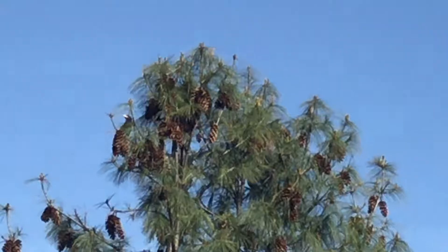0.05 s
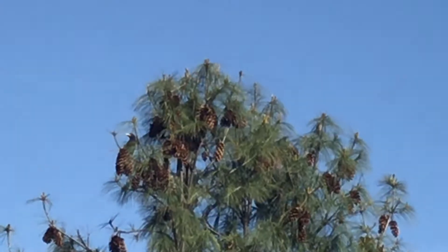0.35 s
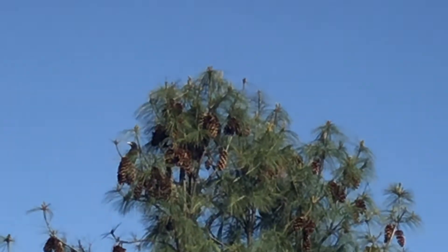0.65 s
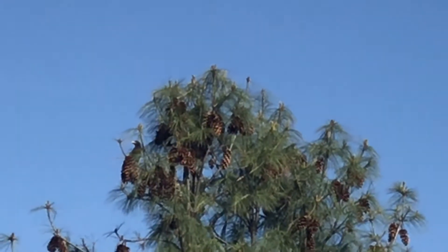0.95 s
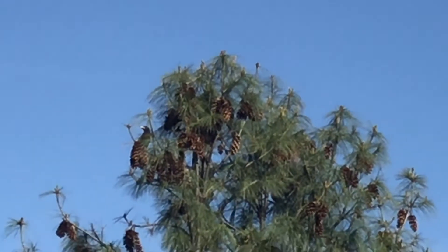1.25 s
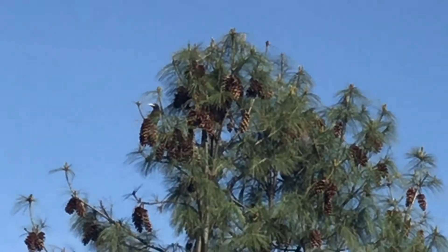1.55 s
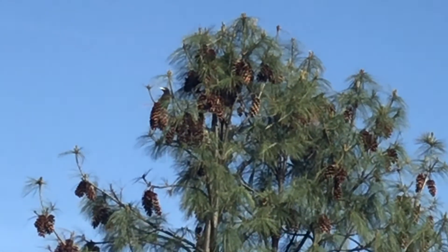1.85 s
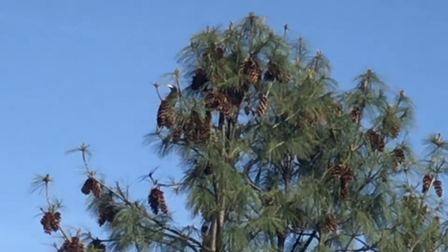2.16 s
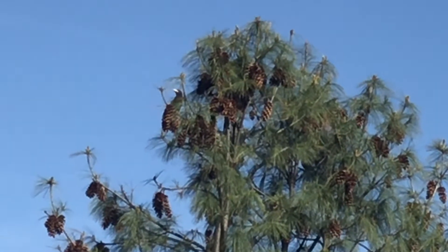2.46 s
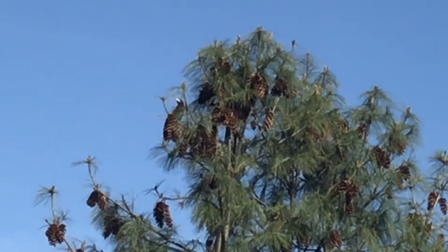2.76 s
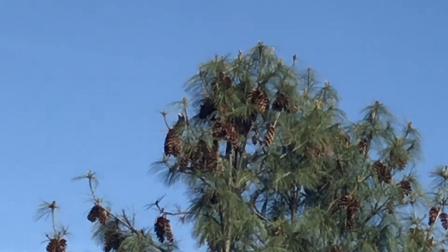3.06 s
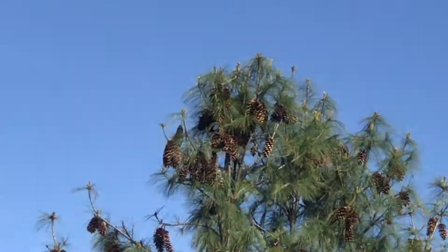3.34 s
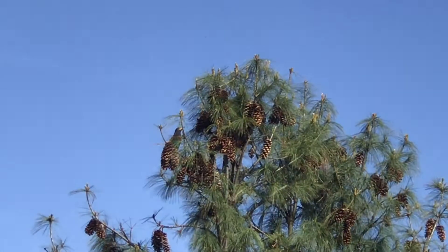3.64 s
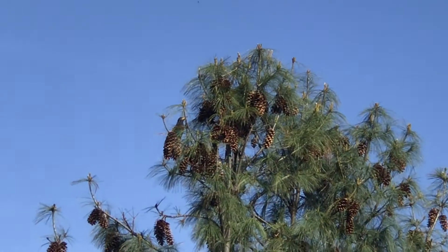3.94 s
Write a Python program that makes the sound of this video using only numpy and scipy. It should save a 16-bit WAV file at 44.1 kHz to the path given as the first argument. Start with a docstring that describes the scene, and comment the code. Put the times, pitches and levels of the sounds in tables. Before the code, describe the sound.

Small birds whistle thin, gliding notes in a pine over soft hiss and handling bumps.

```python
"""Under a pine, microphone on a hand-held camera. Open air murmurs and hisses over a low drone.
From half a second a larger bird, far off, repeats a falling call; faint peeps come from the crown.
Then small birds overhead whistle thin, gliding notes, and the recorder's noise suppression turns down
the murmur and hiss for about a second. The hand rustles and clicks on the case here and there,
with one thump just after three seconds; the birds sing on to the end."""
import sys
import numpy as np
from scipy import signal
from scipy.fft import rfft, irfft
from scipy.io import wavfile
from scipy.ndimage import uniform_filter1d

SR = 44100
rng = np.random.default_rng(int(sys.argv[2]) if len(sys.argv) > 2 else 0)


def generate_wav(signal):
    """Clip the signal to [-1, 1] and save it as 16-bit WAV at the path in sys.argv[1]."""
    frames = np.transpose(np.atleast_2d(signal))
    scaled = np.clip(frames, -1, 1) * 32767
    pcm = np.round(scaled).astype(np.int16)
    wavfile.write(sys.argv[1], SR, pcm)


N = 176400
T = np.arange(N) / SR

# Whistles overhead in the crown: level/dB before the throat resonance, path of (t/s, f/Hz)
WHISTLES = [ (-77, [(.65, 7200), (.658, 4550), (.698, 5230)]), (-80, [(1.595, 5270), (1.63, 6160),
            (1.668, 5300), (1.708, 4870)]), (-78, [(1.78, 6150), (1.81, 5700)]), (-66, [(1.83, 4510),
            (1.85, 4550), (1.932, 6080), (1.952, 6100)]), (-67.5, [(1.989, 4670), (2.008, 4520),
            (2.028, 5220), (2.046, 4160)]), (-65, [(2.048, 4300), (2.056, 6730), (2.103, 6080),
            (2.14, 4650), (2.2, 3620)]), (-69.5, [(2.294, 6240), (2.301, 5540), (2.335, 5130)]),
            (-68, [(2.352, 3900), (2.382, 5900), (2.421, 6150)]), (-71.5, [(2.428, 7380), (2.438, 5620),
            (2.465, 5000), (2.497, 4960)]), (-68, [(2.547, 6700), (2.578, 5630), (2.592, 7900)]),
            (-70, [(2.6, 6150), (2.612, 4690), (2.632, 4550), (2.72, 6100), (2.744, 6040)]),
            (-75.5, [(2.657, 6400), (2.677, 6700)]), (-71, [(2.747, 6100), (2.776, 6450)]),
            (-67.5, [(2.782, 4720), (2.802, 4550), (2.818, 5110), (2.835, 4340)]), (-74, [(2.832, 5200),
            (2.85, 6550), (2.895, 6050)]), (-75, [(2.858, 4500), (2.882, 6600)]), (-66.5, [(2.888, 7360),
            (2.895, 6100), (2.91, 5550), (2.935, 7900)]), (-72, [(2.92, 5100), (2.985, 3760)]),
            (-69, [(2.995, 6000), (3.03, 6430), (3.048, 7300)]), (-68, [(3.063, 7330), (3.076, 6380),
            (3.105, 6350)]), (-70, [(3.132, 8500), (3.146, 7600), (3.178, 7100), (3.21, 7750)]),
            (-69.5, [(3.26, 5740), (3.294, 5900), (3.312, 5360)]), (-68.5, [(3.353, 4670), (3.369, 5450),
            (3.383, 7550)]), (-67, [(3.393, 7950), (3.401, 6030), (3.47, 6700)]), (-70.5, [(3.514, 8300),
            (3.532, 7300), (3.588, 7030), (3.615, 6280), (3.675, 4600)]), (-74, [(3.535, 4650),
            (3.565, 6150), (3.6, 6200)]), (-70.5, [(3.678, 4500), (3.69, 5260), (3.718, 8300)]),
            (-66.5, [(3.785, 5440), (3.836, 5370)]), (-69, [(3.838, 5150), (3.873, 6170), (3.893, 4950),
            (3.912, 4300)]), (-67.5, [(3.95, 4300), (3.975, 5360), (4.01, 5450)])]
# Faint contact calls from the same tree: t/s, level/dB
PEEPS = [(0.577, -78), (.652, -79.5), (.743, -79.5), (.84, -82)]
# Pitch path of one peep: t/s from its start, f/Hz
PEEP_PATH = [(0, 6760), (.025, 7230), (.055, 7130)]
THROAT_HZ, THROAT_WIDTH_HZ = 6050, 2950
ECHO_S, ECHO_DB, NEEDLES_DB = 0.026, -19.5, -5


def small_birds():
    """Overhead: whistles, two-voiced peeps and one buzz, with a near echo and scatter off the needles."""
    song = np.zeros(N)
    for db, path in WHISTLES:
        add(song, path[0][0], note(path, db))
    song = resonance(song, THROAT_HZ, THROAT_WIDTH_HZ)
    upper_voice = [(t, hz * 1.16) for t, hz in PEEP_PATH]
    for start, db in PEEPS:
        add(song, start, note(PEEP_PATH, db, trill_hz=200))
        add(song, start, note(upper_voice, db - 8.5, crest=0.57))
    buzz = note([(0, 2790), (0.125, 2980)], db=-77, crest=0.89, trill_hz=90)
    add(song, 1.85, buzz)
    echo = from_db(ECHO_DB) * np.interp(T - ECHO_S, T, song)
    return song + echo + from_db(NEEDLES_DB) * scatter(song, t60_s=0.34)


GLIDE_S, NOTE_EDGE_S, TRILL_RATE_HZ = 0.009, 0.0033, 82
QUAVER_SHARE, FLUTTER_DB = 0.0058, 3


def note(path, db, crest=0.61, trill_hz=0, swell_db=4):
    """One bird note: a pure tone glides along its path, trills by +/- trill_hz, swells and fades."""
    t = np.arange(0, max(path[-1][0] - path[0][0], .01), 1 / SR)
    hz = uniform_filter1d(curve(path, t + path[0][0]), int(GLIDE_S * SR), mode="nearest")
    hz *= 1 + QUAVER_SHARE * drift(100, len(t))
    hz += trill_hz * np.sin(2 * np.pi * TRILL_RATE_HZ * t)
    swell = np.interp(t / t[-1], [0, crest, 1], [-swell_db, 0, -swell_db])
    gain = from_db(db + swell + FLUTTER_DB * drift(60, len(t)))
    edges = np.sin(np.pi / 2 * np.clip(np.minimum(t, t[-1] - t) / NOTE_EDGE_S, 0, 1))
    return np.sqrt(2) * edges * gain * sine(hz)


# Long calls, far off in the valley: t/s, level/dB, length/s
FAR_CALLS = [(0.531, -77, 0.54), (1.52, -77.5, 0.36), (2.439, -82, 0.53), (3.53, -77, 0.52)]
# Pitch path of one call: t/s from its start, f/Hz
FAR_PATH = [(0, 1467), (.04, 1420), (.08, 1216), (.21, 1201), (.255, 1280), (.38, 1254), (.55, 1175)]
# Short notes at the same distance: t/s, level/dB, f/Hz
FAR_PIPS = [(1.45, -77, 1770), (1.67, -77, 1690), (1.945, -73, 1364), (2.099, -76, 1400)]
PIP_S, PIP_SAG_HZ, VALLEY_DB = 0.067, 40, -5.5


def far_bird():
    """Far off: a call drops, steps up and sags about once a second, with short pips; distance blurs it."""
    calls = np.zeros(N)
    for start, db, length in FAR_CALLS:
        path = [(t, curve(FAR_PATH, t)) for t in T[:int(length * SR):SR // 100]]
        add(calls, start, note(path, db, swell_db=1))
    for start, db, hz in FAR_PIPS:
        add(calls, start, note([(0, hz), (PIP_S, hz - PIP_SAG_HZ)], db))
    return calls + from_db(VALLEY_DB) * scatter(calls, t60_s=0.26)


# Knocks right at the microphone: t/s, level/dB before filtering, settling f/Hz, treble limit f/Hz
KNOCKS = [(.557, -49.5, 152, 1190), (0.9627, -40.5, 100, 1290), (2.2278, -49, 300, 6130),
          (2.532, -57.5, 300, 5900), (2.911, -39, 248, 4530), (3.0718, -21.5, 34.3, 2690),
          (3.19, -46.5, 220, 2770), (3.223, -48, 219, 1400), (3.258, -48, 225, 1990)]
# Resonances of the camera case: f/Hz, width/Hz, level/dB relative to the knocks
CASE_MODES = [(224, 65, -11), (592, 60, -3), (1194, 37, -3), (2590, 210, -2.5)]
SWEEP_START_S, SWEEP_CYCLES_PER_HZ = 0.00015, 0.0001803  # brighter knocks sweep further
THUD_DECAY_S, THUD_AT_HZ, THUD_POWER = 0.0064, 150, 0.76  # higher thuds die sooner
RATTLE_DB, RATTLE_BAND_HZ = -10, (220, 1580)


def knocks():
    """On the case: treble arrives first, so each knock sweeps down to a thud; the case rattles, rings."""
    hits, t = np.zeros(N), T[:SR // 5]
    for start, db, hz, top_hz in KNOCKS:
        sweep_hz = SWEEP_CYCLES_PER_HZ * top_hz / (t + SWEEP_START_S)
        decay_s = THUD_DECAY_S * (THUD_AT_HZ / hz) ** THUD_POWER
        thud = sine(hz + sweep_hz) * np.exp(-t / decay_s)
        lowpass = signal.butter(8, top_hz, fs=SR, output="sos")
        add(hits, start, from_db(db) * signal.sosfilt(lowpass, thud))
    rattle_band = signal.butter(2, RATTLE_BAND_HZ, "band", fs=SR, output="sos")
    hits += from_db(RATTLE_DB) * signal.sosfilt(rattle_band, scatter(hits, t60_s=0.15))
    return hits + sum(from_db(db) * resonance(hits, hz, width) for hz, width, db in CASE_MODES)


# The grip shifting beside the microphone: t/s, level/dB
GRIP_LEVEL = [(0, -68), (.45, -76.5), (.58, -66.5), (.95, -66), (1.05, -80), (1.8, -73.5), (2.2, -85),
              (2.895, -96), (2.915, -55.5), (3.06, -67.5), (3.33, -67), (3.41, -58.5), (3.5, -75)]
# Colour of the rubbing: f/Hz, relative level/dB
RUSTLE_SPECTRUM = [(60, -21), (200, 3.5), (600, 1), (1200, -13), (2800, -11.5), (4200, -26.5), (9000, -43)]
SLIPS_PER_S = 1500


def hand_rustle():
    """Close up: skin rubs on the case in many tiny slips."""
    slips = (rng.random(N) < SLIPS_PER_S / SR) * rng.standard_normal(N)
    return from_db(curve(GRIP_LEVEL)) * coloured(slips, RUSTLE_SPECTRUM)


# Rise and fall of the drone in the distance: t/s, level/dB
DRONE_LEVEL = [(.75, -55), (.92, -66), (1.05, -50), (1.45, -60.5), (1.6, -52.5), (1.82, -51), (1.95, -66),
               (2.18, -57), (2.28, -73), (2.7, -62), (3.4, -58), (4, -71)]
DRONE_HZ, DRONE_WANDER, DRONE_THROB_DB = 64.1, 0.052, 1.5


def drone():
    """Beneath the birds: a wavering low tone, like a far engine."""
    tone = sine(DRONE_HZ * (1 + DRONE_WANDER * drift(12.1)))
    return from_db(curve(DRONE_LEVEL) + DRONE_THROB_DB * drift(17)) * rms_one(tone)


# Murmur of the air around the tree: f/Hz, relative level/dB
AIR_SPECTRUM = [(20, -26), (45, -1), (75, 7), (110, -4.5), (200, -10), (400, -16), (460, -20.5), (600, -16),
                (820, -25), (1200, -22.5), (1700, -26.5), (3000, -41.5)]
# Fine hiss above it: f/Hz, relative level/dB
HISS_SPECTRUM = [(300, -12), (2500, 12), (3900, 9.5), (4700, 4), (9000, 0), (10400, -6.5), (12000, -0.5)]
AIR_DB, HISS_DB = -59.5, -73.5
SUPPRESSOR_START_S, SUPPRESSOR_END_S, SUPPRESSOR_FADE_S = 1.83, 2.908, 0.008
SUPPRESSOR_AIR_DB, SUPPRESSOR_HISS_DB = -5.5, -12.5


def air_and_hiss():
    """Murmur of air and a fine hiss; the recorder's noise suppression turns both down for a second."""
    suppressor_on = (T > SUPPRESSOR_START_S) & (T < SUPPRESSOR_END_S)
    suppression = uniform_filter1d(suppressor_on.astype(float), int(SUPPRESSOR_FADE_S * SR))
    air_gain = from_db(AIR_DB + SUPPRESSOR_AIR_DB * suppression + 1.82 * drift(17.8))
    air = air_gain * coloured(rng.standard_normal(N), AIR_SPECTRUM)
    hiss_gain = from_db(HISS_DB + SUPPRESSOR_HISS_DB * suppression + 1.4 * drift(99))
    hiss = hiss_gain * coloured(rng.standard_normal(N), HISS_SPECTRUM)
    return air + hiss


def from_db(db):
    """Decibels to gain."""
    return 10 ** (np.asarray(db) / 20)


def rms_one(x):
    """Scale to unit rms."""
    return x / np.sqrt(np.mean(x ** 2) + 1e-20)


def curve(rows, t=T):
    """Straight lines through (t/s, value) points."""
    return np.interp(t, *np.transpose(rows))


def sine(hz):
    """A sine that follows a changing pitch."""
    return np.sin(2 * np.pi * np.cumsum(hz) / SR)


def drift(rate_hz, size=N):
    """Smooth random wander with a spread of about one."""
    pole = np.exp(-2 * np.pi * rate_hz / SR)
    wander = signal.lfilter([1], [1, -2 * pole, pole * pole], rng.standard_normal(size + SR))
    return rms_one(wander[SR // 2:])[-size:]


def coloured(x, spectrum):
    """Shape a sound by (f/Hz, level/dB) points; unit rms."""
    hz, db = np.transpose(spectrum)
    bins = np.maximum(np.fft.rfftfreq(N, 1 / SR), 1)
    gain = from_db(np.interp(np.log(bins), np.log(hz), db))
    return rms_one(irfft(rfft(x) * gain, N))


def resonance(x, hz, width_hz):
    """Pass a sound through one resonant peak."""
    return signal.lfilter(*signal.iirpeak(hz, hz / width_hz, fs=SR), x + 1e-18)


def scatter(x, t60_s):
    """A dense, dying cloud of reflections."""
    tail = rng.standard_normal(SR) * from_db(-60 * T[:SR] / t60_s)
    return signal.fftconvolve(x, tail / np.linalg.norm(tail))[:N]


def add(out, start, x):
    """Mix a sound in at its start time."""
    i = int(np.clip(start * SR, 0, N))
    out[i:i + len(x)] += x[:N - i]


def scene():
    """Far and near meet at one microphone under the pine."""
    return (air_and_hiss() + drone() + hand_rustle() + knocks() + far_bird() + small_birds())[None]


OPENS_S, FADE_IN_S, CUTOFF_HZ = 0.072, 0.0071, 15750


def record(dry):
    """The sound opens after a short silence; the top treble is cut steeply."""
    opened = dry * np.clip((T - OPENS_S) / FADE_IN_S, 0, 1)
    return signal.sosfilt(signal.ellip(12, .1, 70, CUTOFF_HZ, fs=SR, output="sos"), opened)


dry = scene()
out = record(dry)
generate_wav(out)
```